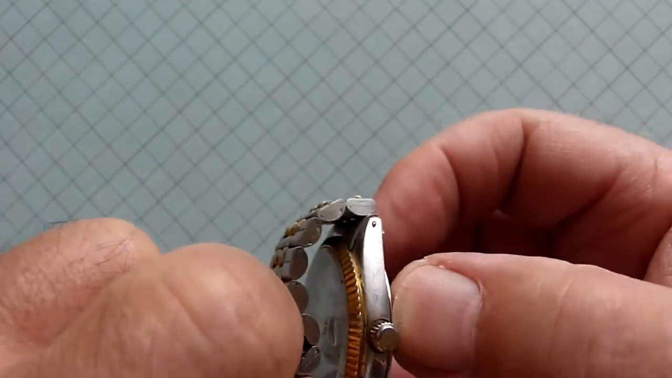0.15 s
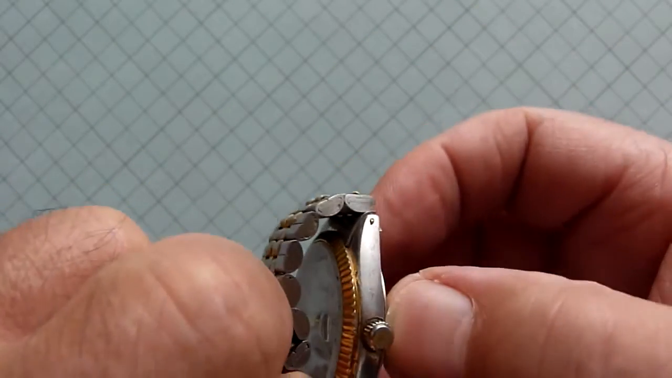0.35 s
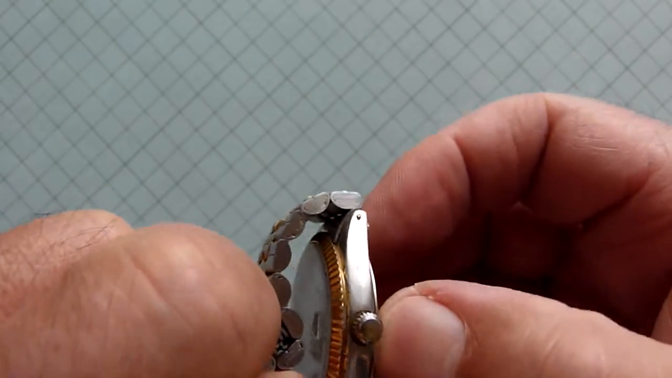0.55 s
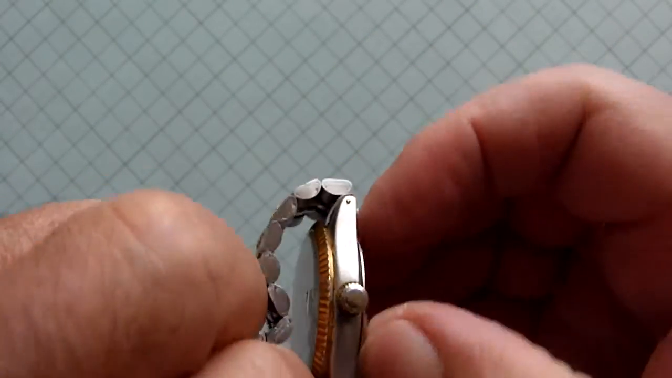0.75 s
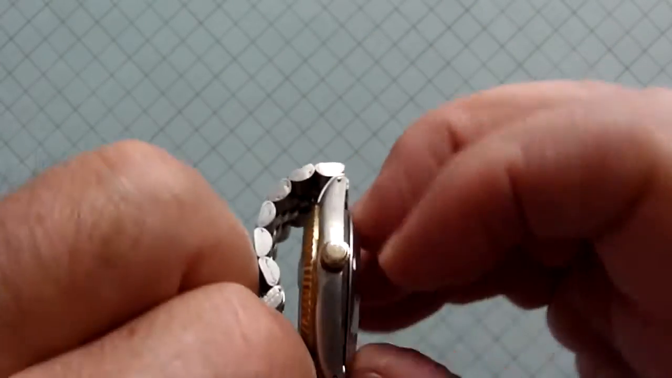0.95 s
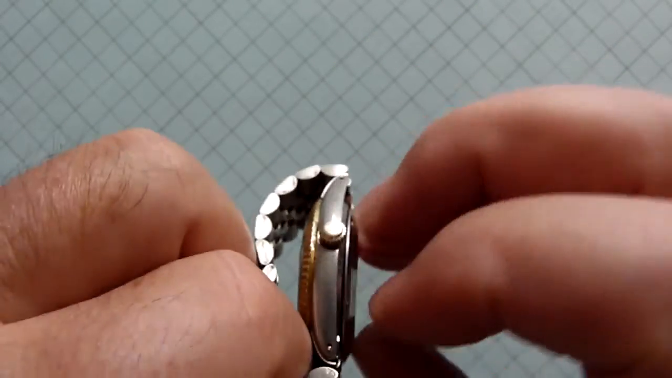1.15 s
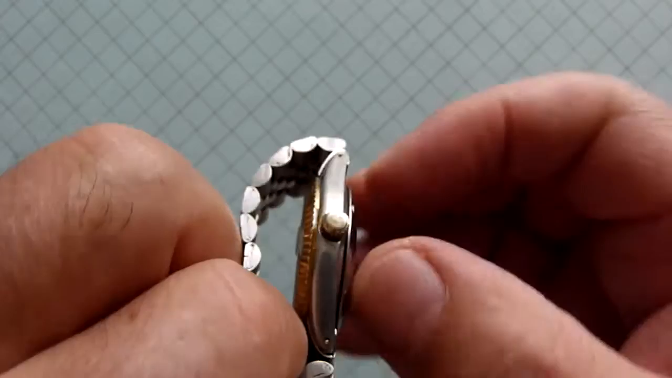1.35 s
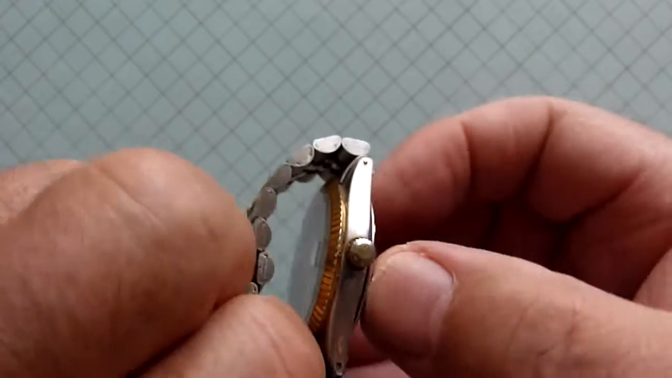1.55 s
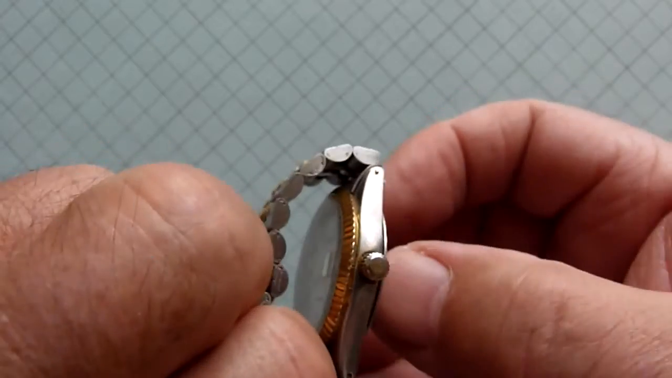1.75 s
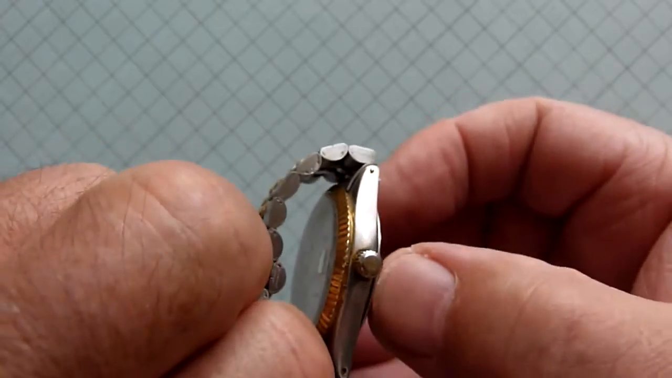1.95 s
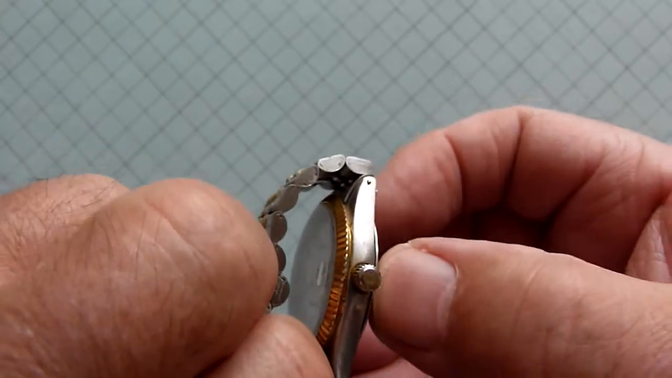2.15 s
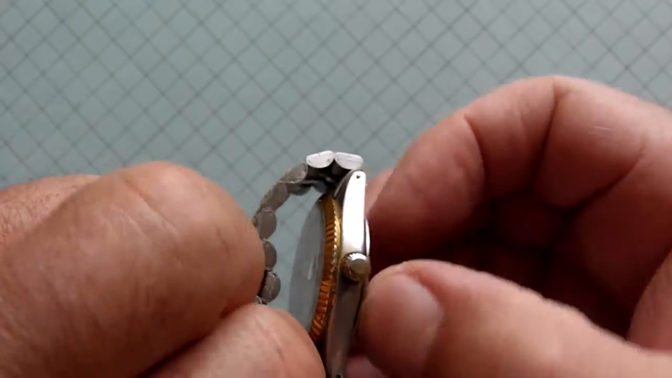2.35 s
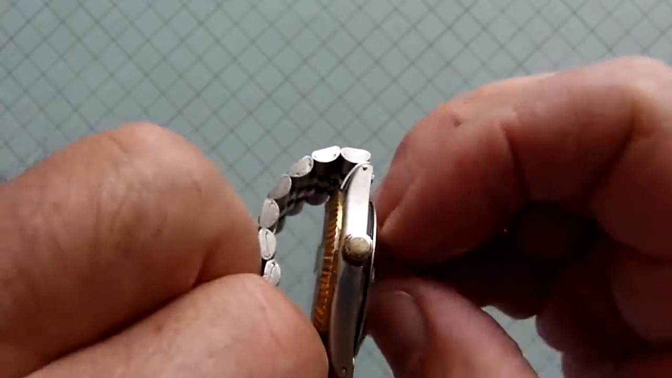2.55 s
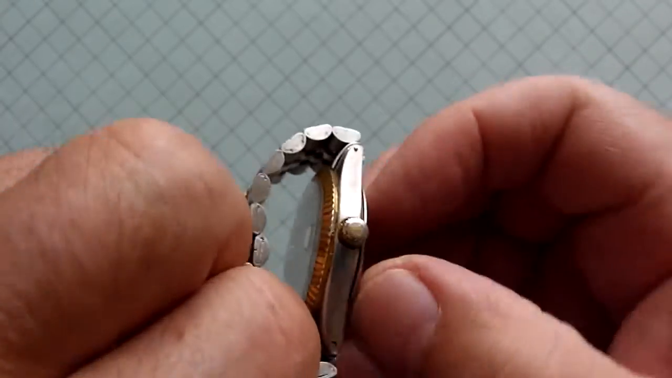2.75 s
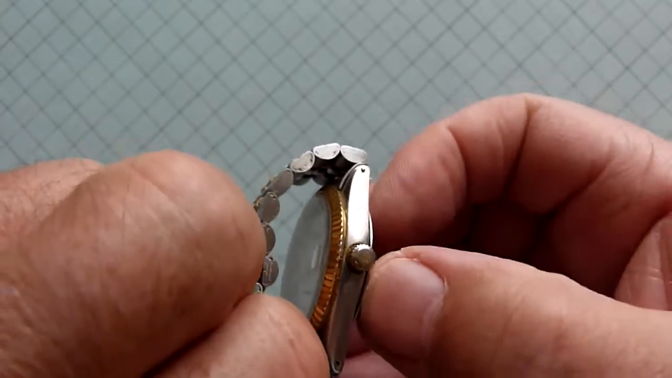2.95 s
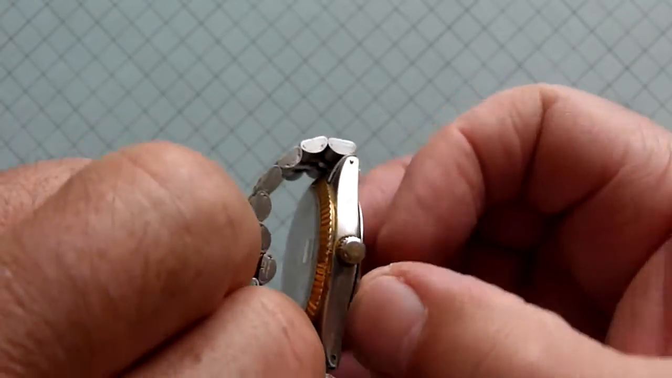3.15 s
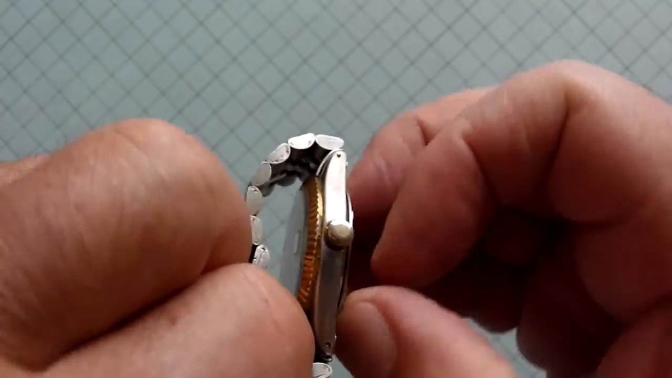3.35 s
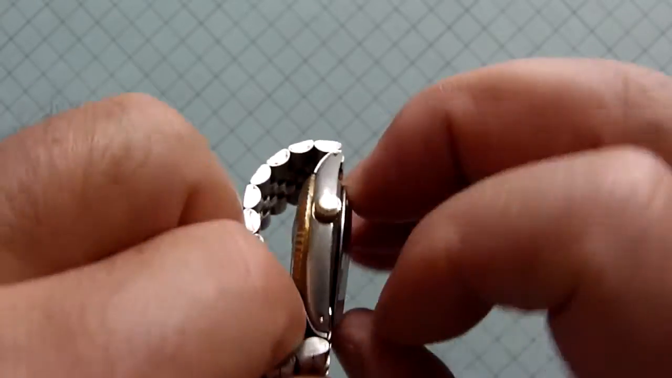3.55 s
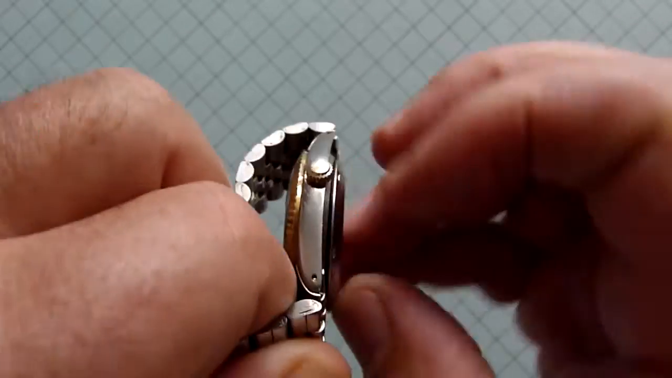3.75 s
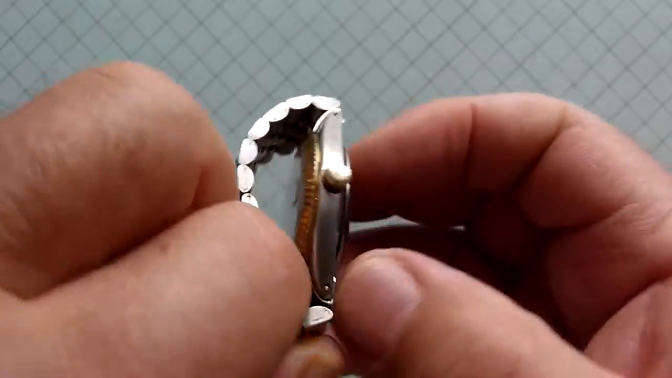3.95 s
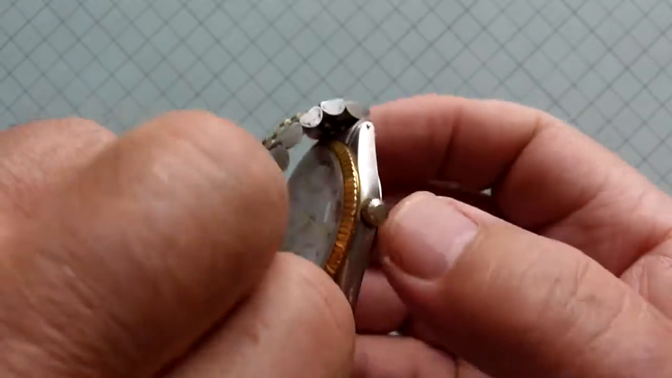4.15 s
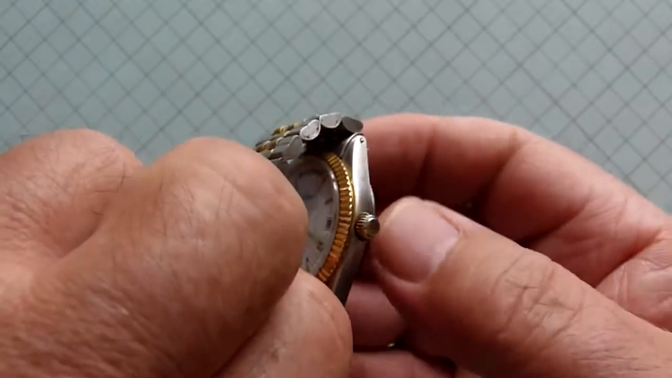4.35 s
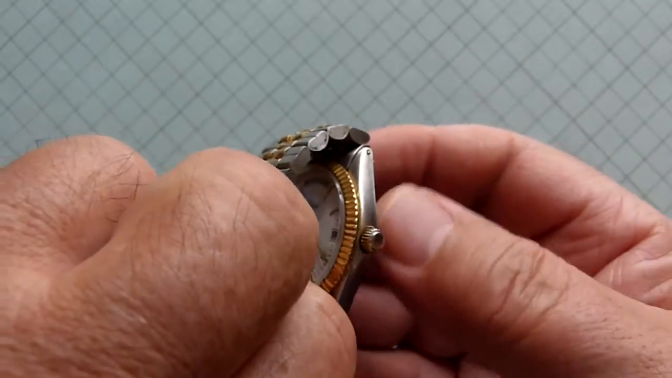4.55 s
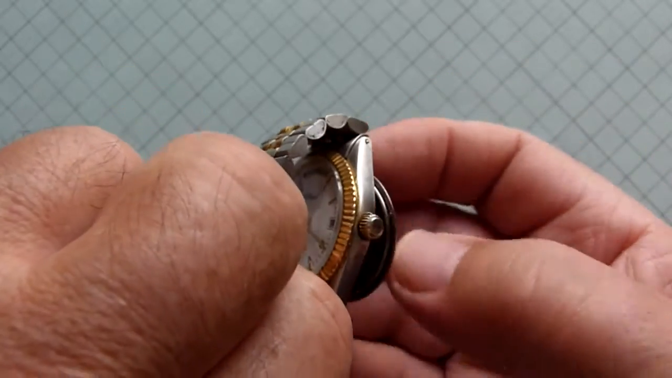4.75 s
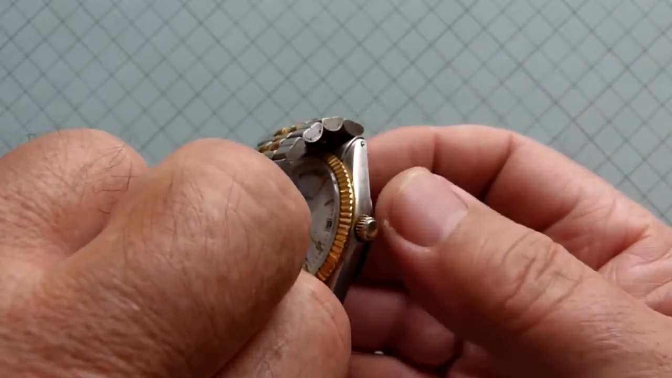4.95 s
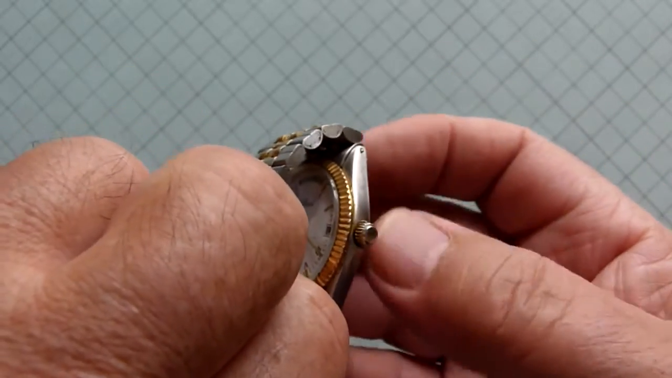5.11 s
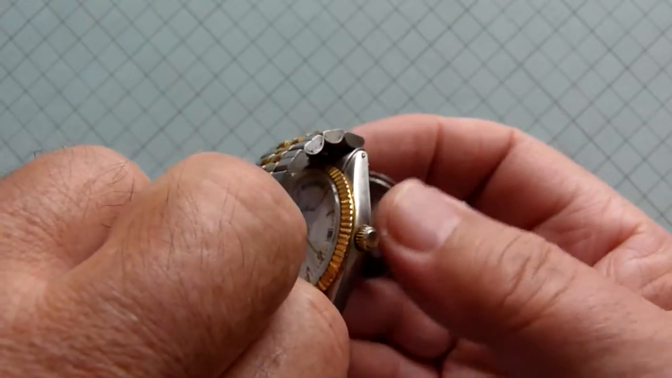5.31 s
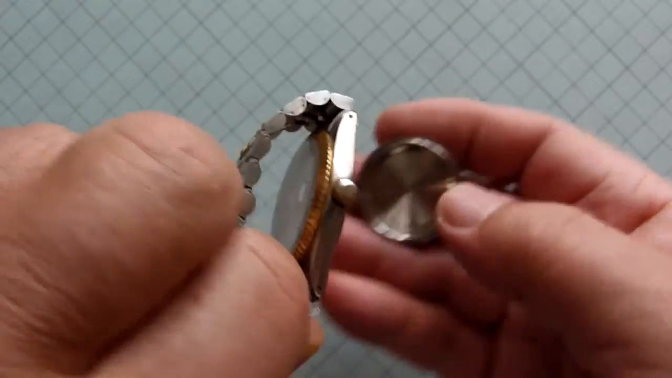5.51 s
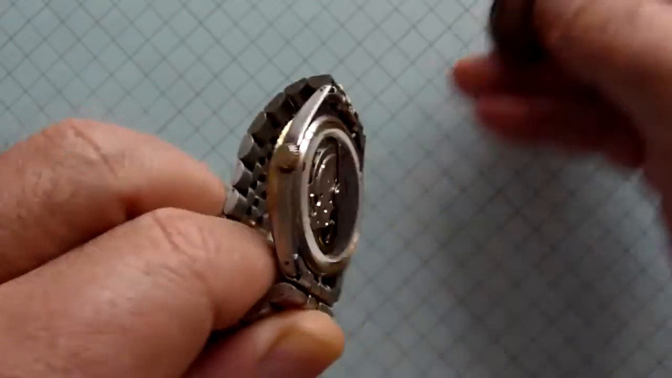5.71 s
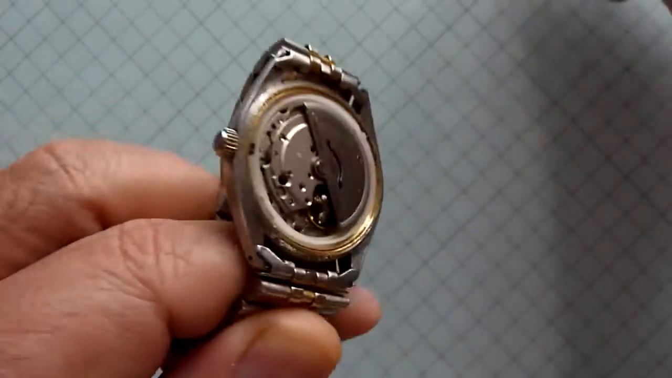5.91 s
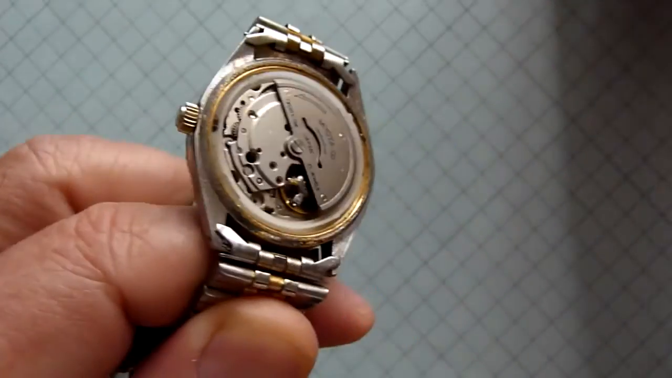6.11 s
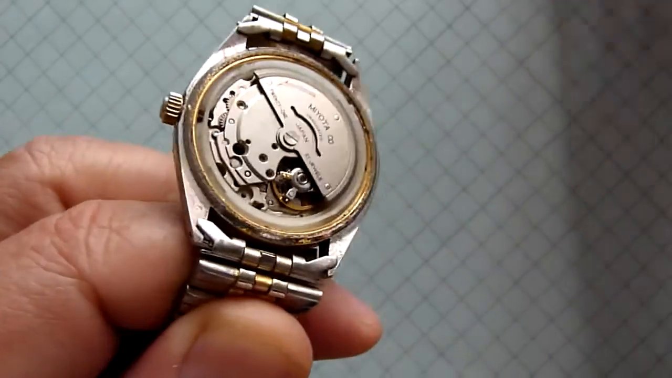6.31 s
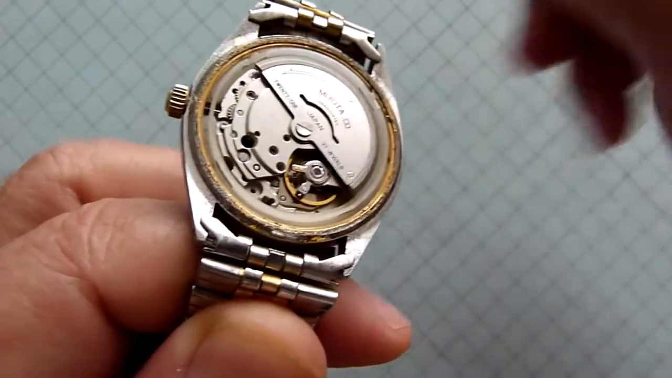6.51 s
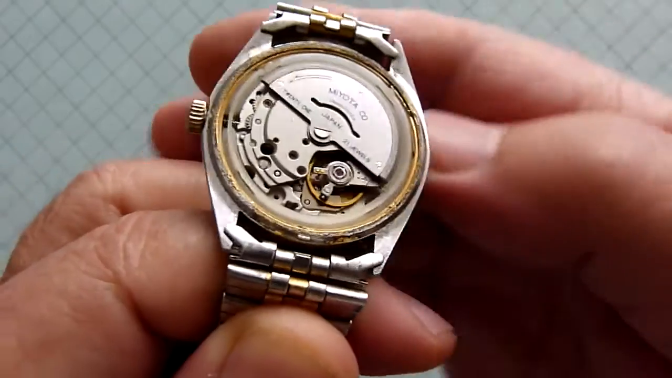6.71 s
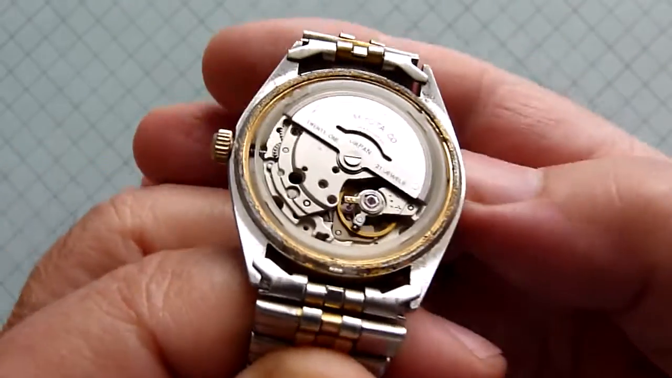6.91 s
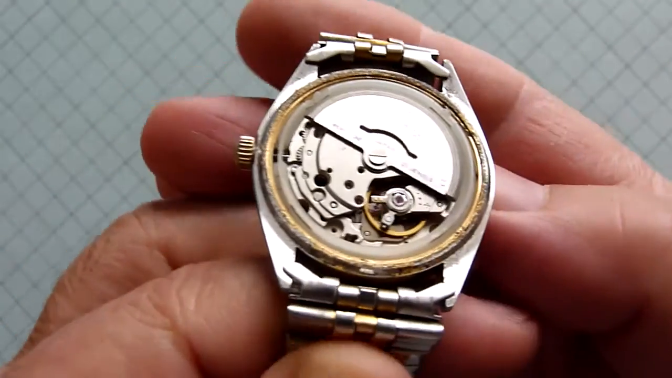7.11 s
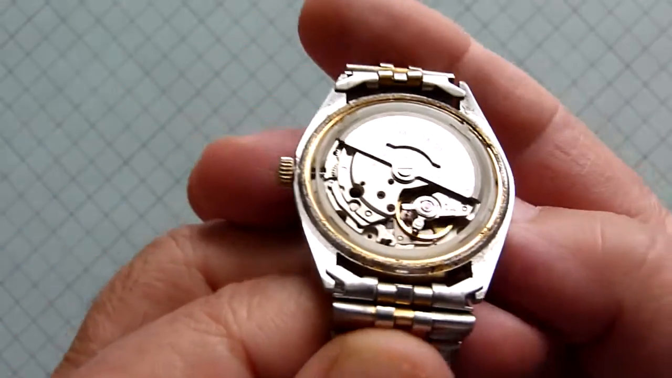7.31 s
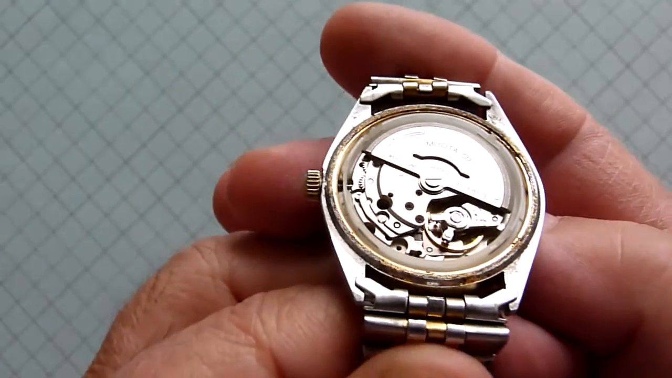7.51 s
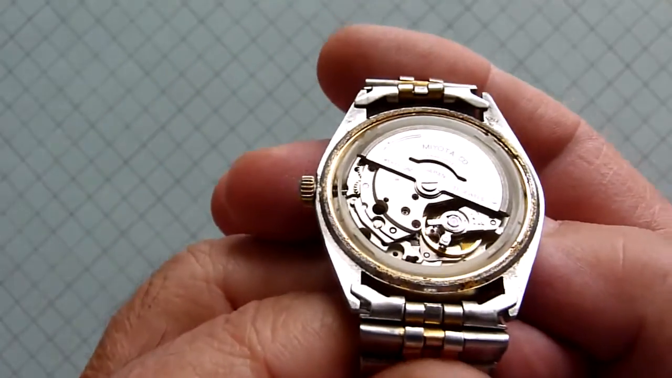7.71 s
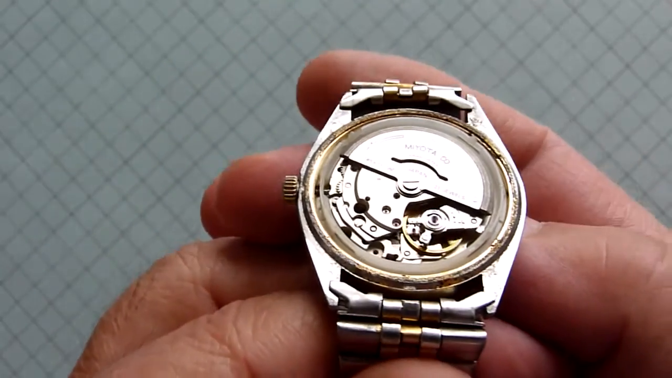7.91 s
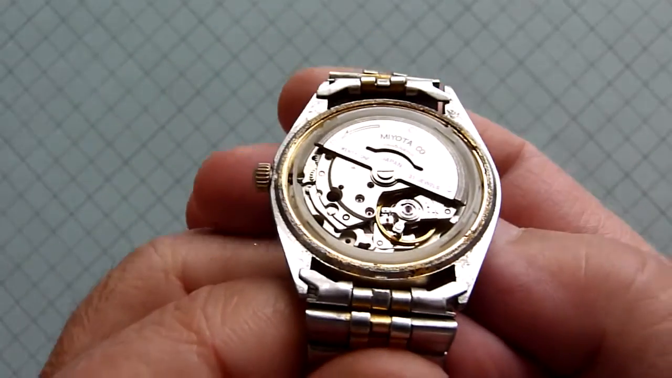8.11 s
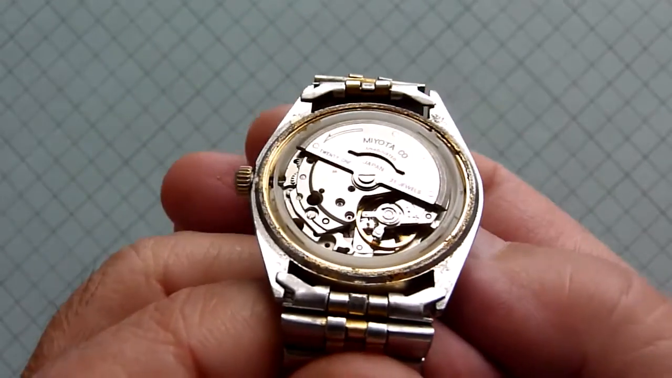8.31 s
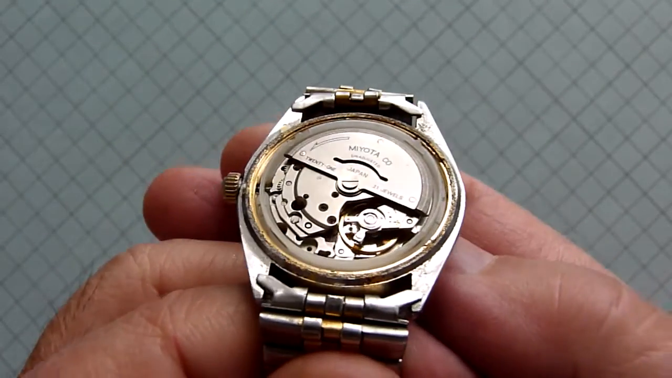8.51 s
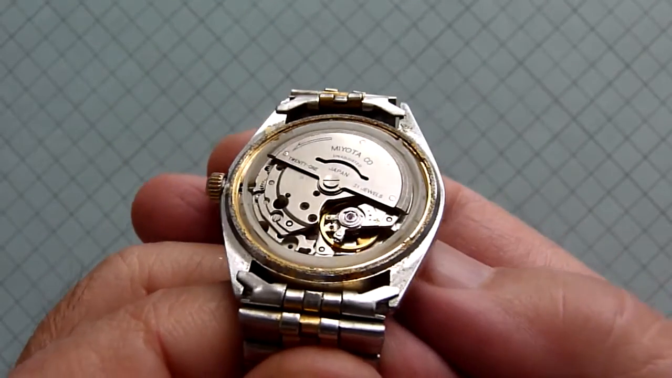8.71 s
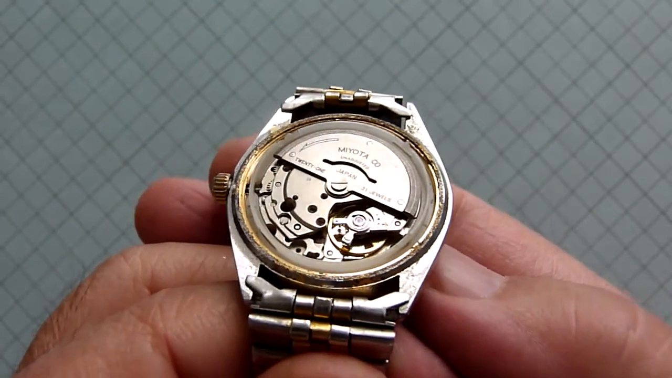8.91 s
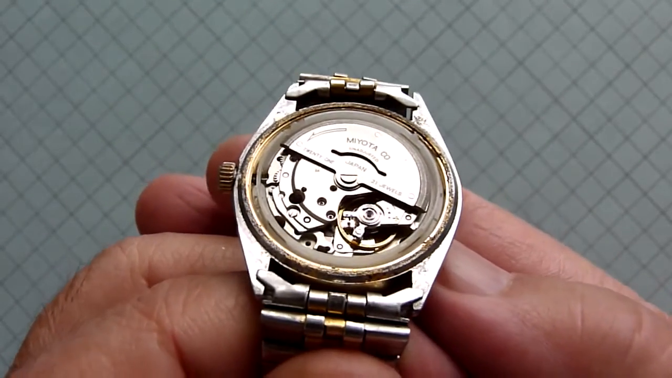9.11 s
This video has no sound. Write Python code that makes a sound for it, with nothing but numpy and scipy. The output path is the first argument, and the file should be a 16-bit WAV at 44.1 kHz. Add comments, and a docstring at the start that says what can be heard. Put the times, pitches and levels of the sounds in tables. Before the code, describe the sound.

Small metal ticks and rattles as a wristwatch's steel back is pried loose, snaps off with a bright clink, then is set down.

```python
"""The steel back of a wristwatch is pried off: the thin lid rattles on the case, squeaks on the rim,
then snaps free with a bright, ringing clink. Before that, bracelet links tick and a fingernail clicks.
The lid lands on a mat in three dull knocks, and the bracelet clinks once more.
Each hit is a set of decaying modes plus a crack of noise; rubs and scrapes are sprays of tiny slips.
It all plays close up in a small, quiet room with a humming motor."""
import sys
import numpy as np
from scipy import signal
from scipy.fft import rfft, irfft, next_fast_len
from scipy.io import wavfile
from scipy.ndimage import map_coordinates

SR = 44100
rng = np.random.default_rng(int(sys.argv[2]) if len(sys.argv) > 2 else 0)


def put_to_file(sound):
    """Save the sound as 16-bit audio at rate SR, in the file named by the first command-line argument."""
    columns = np.atleast_2d(sound).T  # one column per channel
    safe = np.clip(columns, -1, 1)
    whole_steps = np.round(safe * 32767)
    wavfile.write(sys.argv[1], SR, whole_steps.astype(np.int16))


N = 404232
BENDING_HZ = 2600  # modes below this bend the whole part


def lid():
    """The thin steel disc rattles on the case; hard taps crack sharply and leave it ringing."""
    # lid hitting the case: t/s, body/dB, edge/dB, f/Hz favoured by the point of contact
    taps = [(4.108, -49.5, -55.5, 1620), (4.137, -45, -53, 1700), (4.1743, -36.5, -57, 1200),
            (4.1844, -44, -51, 1650), (4.211, -38.5, -32.5, 1400), (4.218, -39.5, -45, 1730),
            (4.321, -43.5, -39.5, 1290), (4.695, -37.5, -44.5, 1650), (4.701, -33, -44.5, 1450),
            (4.7091, -41.5, -45.5, 1400), (4.748, -45, -55, 1550), (4.8597, -37, -43.5, 1730),
            (4.9466, -43.5, -50.5, 1720), (5.1905, -42.5, -61, 1400), (5.2259, -32, -34.5, 1880),
            (5.3515, -40.5, -58, 1600), (5.3573, -38, -45, 1580), (5.539, -28, -21, 1700),
            (5.5447, -40.5, -26.5, 1800), (5.5866, -31.5, -28, 2150), (5.6022, -44, -37.5, 2150),
            (5.606, -36, -37.5, 2100)]
    # the disc's modes: f/Hz, energy/dB, t60/s before the sustain factor
    disc_modes = [(1190, 1, 0.016), (1444, 3, 0.018), (1596, 8.5, 0.019), (1796, 11.5, 0.01),
                  (2010, 3, 0.028), (2232, -2.5, 0.037), (3630, -13, 0.028), (4840, 2, 0.0077),
                  (5660, -4, 0.022), (6830, -11, 0.017), (8700, -5.5, 0.018), (9370, -3.5, 0.016),
                  (10750, -12, 0.01), (11500, 2.5, 0.032), (14600, -7, 0.023)]
    # the disc's lasting shimmer: f/Hz, relative level/dB
    shimmer = [(2184, -20), (5655, -20), (6900, -26), (8526, -23), (8660, -22), (9398, -22), (10745, -21),
               (11377, -21), (11444, -15), (11508, -22), (14510, -22)]
    # the case singing along under the seated lid: f/Hz, energy/dB, t60/s before the sustain factor
    case_ring = [(3650, -2, 0.028), (5670, 2, 0.047)]
    free_s = 5.53  # the lid comes away
    ring_t60, halving_hz = .38, 11000  # the shimmer's decay time halves every halving_hz
    out, t = np.zeros((2, N)), np.arange(SR // 3) / SR
    for s, body_db, edge_db, favoured_hz in taps:
        modes, partials = favour(disc_modes, favoured_hz, slope_db=21.5), shimmer
        if s < free_s:  # damped by the case, screened from the room by the hands
            modes, partials = seated(modes) + case_ring, seated(partials)
            sustain, wet_db, ring_db, max_tilt_db = 0.61, -10, -7, 3.5
        else:
            sustain, wet_db, ring_db, max_tilt_db = 0.7, -8, 0.5, 6.5
        modes = [(hz, db, t60 * sustain) for hz, db, t60 in modes]
        hardness_db = edge_db - body_db
        tilt_db = np.clip(2 * hardness_db + 7, -6.5, max_tilt_db)
        tap = contact(modes, body_db, edge_db, tilt_db,
                      crack_db=0.099 * hardness_db - 1, crack_t60=0.012, crack_hz=6530, scatter_db=-6)
        ring = sum(amp(db) * fade(t, ring_t60 * .5 ** (hz / halving_hz))
                   * np.sin(2 * np.pi * (hz * t + rng.random((2, 1)))) for hz, db in partials)
        clink = amp(edge_db + min(tilt_db, 0) + ring_db) * ring
        add(clink, 0, tap)
        add(out, s, in_room(clink, wet_db))
    # the lid sits to the right, so the left side is shaded from its treble
    return filtered(out, lambda f: amp(np.array([[-1], [1]]) * 0.99 * (f / 12000) ** 2))


def seated(modes):
    """The rim of the case presses on the lid and damps one band of its modes."""
    centre_hz, half_width_hz, loss_db = 9800, 1000, 4
    return [(hz, db - loss_db * np.exp(-((hz - centre_hz) / half_width_hz) ** 2), *rest)
            for hz, db, *rest in modes]


def release():
    """The lid springs out of its seat with one very short, bright snap."""
    # the snap: t/s, peak/dB, f/Hz, width/s, lag between left and right/s
    rim_snap = (5.5394, -4.5, 10200, .00018, .00002)
    s, db, hz, width, lag = rim_snap
    out, t = np.zeros((2, N)), np.arange(-SR // 500, SR // 500) / SR
    stereo_t = t + np.array([[-.5], [.5]]) * lag
    snap = amp(db) * np.exp(-np.abs(stereo_t) / width) * np.cos(2 * np.pi * hz * stereo_t)
    add(out, s + t[0], in_room(snap, wet_db=-11))
    return out


def squeaks():
    """The lid sticks and slips on the rim at its own bending note: tiny chirps that sag in pitch."""
    # stick-slip chirps: t/s, length/s, level/dB, f/Hz
    chirps = [(4.7, 0.0057, -46, 1820), (4.8653, 0.0054, -32.5, 1800), (4.8718, 0.0053, -32.5, 1680)]
    sag, overtones_db = .02, (-14, -23, -26)
    out = np.zeros((2, N))
    for s, length, db, hz in chirps:
        size = int(length * SR)
        phase = 2 * np.pi * np.cumsum(hz * (1 + sag * np.linspace(.5, -.5, size))) / SR
        overtones = sum(amp(over_db) * np.sin(k * phase + 2 * np.pi * rng.random())
                        for k, over_db in enumerate(overtones_db, 2))
        chirp = amp(db) * unit(np.sin(phase) + overtones) * signal.windows.tukey(size, .5)
        add(out, s, in_room(np.array([chirp, chirp]), wet_db=-9))
    return out


def mat():
    """The soft mat dulls the lid's knocks to hollow notes, and the table thumps underneath."""
    # lid set down: t/s, body/dB, edge/dB, favoured f/Hz, table thump/dB
    knocks = [(6.3864, -28, -42, 1260, -43), (6.5902, -34, -45, 910, -36), (6.6305, -31, -46.5, 1180, -47)]
    # the lid's modes on the mat: f/Hz, energy/dB, t60/s
    muted_modes = [(598, -11, 0.022), (1055, 4, 0.011), (1270, 2, 0.0056), (1920, 10.5, 0.0066),
                   (3230, 3.5, 0.0031), (11600, -1, .01)]
    out = np.zeros((2, N))
    for s, body_db, edge_db, favoured_hz, thump_db in knocks:
        modes = favour(muted_modes, favoured_hz, slope_db=22.5)
        knock = contact(modes, body_db, edge_db, tilt_db=-9.5,
                        crack_db=1, crack_t60=0.028, crack_hz=2500, scatter_db=-9)
        add(out, s, in_room(knock, wet_db=-6.5))
        add(out, s, in_room(thump(thump_db, hz=344), wet_db=-5.5))
    return out


def nail():
    """A fingernail slips off the tightly held case: dead clicks, brighter for harder slips."""
    # slips off the rim: t/s, body/dB, edge/dB
    clicks = [(2.7461, -36.5, -45), (2.7712, -44.5, -48), (2.8922, -38.5, -36), (3.6563, -46, -44),
              (3.8561, -48, -47.5), (3.932, -56, -50.5), (4.3988, -44.5, -47)]
    # the gripped case's modes: f/Hz, energy/dB, t60/s
    case_modes = [(440, -15, 0.0094), (1150, 4.5, 0.0028), (1450, 5.5, 0.0033), (1890, -8, 0.0081),
                  (3600, 1, 0.0024), (6130, 4.5, 0.0038), (9100, 11, 0.0036), (11560, -2, 0.018)]
    out = np.zeros((2, N))
    for s, body_db, edge_db in clicks:
        tilt_db = 0.11 * (edge_db - body_db) - 4.5
        click = contact(case_modes, body_db, edge_db, tilt_db,
                        crack_db=-1.5, crack_t60=0.018, crack_hz=4200, scatter_db=-8.5)
        add(out, s, in_room(click, wet_db=-9))
    return out


def bracelet():
    """Small links fall against each other with thin ticks; the freer the link, the brighter."""
    # link hits: t/s, body/dB, edge/dB
    ticks = [(0.7063, -53.5, -61.5), (1.133, -52, -55), (1.317, -47.5, -43), (1.4791, -50, -44),
             (1.568, -51, -46), (1.577, -52, -51), (1.6914, -48.5, -44), (1.748, -52, -61),
             (1.9958, -62, -57), (3.003, -62, -52.5), (6.5907, -78, -50.5), (7.415, -57, -53.5),
             (7.751, -67, -52.5), (7.8464, -72, -45.5), (7.8498, -76, -43), (7.8526, -66, -36.5),
             (7.899, -83, -48)]
    # a link's modes: f/Hz, energy/dB, t60/s
    link_modes = [(1000, 7.5, 0.011), (1655, 9.5, 0.0083), (3560, -10, 0.0077), (6370, -4, 0.0019),
                  (9020, -6, 0.0038), (11500, -7.5, 0.0064), (14000, -10, 0.0046)]
    out = np.zeros((2, N))
    for s, body_db, edge_db in ticks:
        tilt_db = min(0.3 * (edge_db - body_db) - 3, 8)
        tick = contact(link_modes, body_db, edge_db, tilt_db,
                       crack_db=-3.5, crack_t60=0.0079, crack_hz=3620, scatter_db=-4.5)
        add(out, s, in_room(tick, wet_db=-7))
    return out


def rubs():
    """The lid or a link slides, catching in many tiny slips that excite one resonance."""
    # slides: middle t/s, length/s, level/dB, f/Hz
    slides = [(0.397, 0.057, -63, 1950), (1.467, 0.018, -52, 1750), (2.909, 0.023, -47, 1770),
              (3.827, 0.058, -55.5, 3030), (4.148, 0.23, -60, 1780), (4.863, .06, -45, 1750),
              (4.95, .14, -58, 1650), (6.441, .12, -57, 1500), (6.605, .035, -44.5, 640)]
    out = np.zeros((2, N))
    for s, length, db, hz in slides:
        size = int(length * SR)
        resonance = signal.iirpeak(hz, Q=2.4, fs=SR)
        catches = slips(size, rate=740, spread_db=5)
        grains = signal.lfilter(*resonance, signal.lfilter(*resonance, catches))
        stroke = amp(db) * unit(grains) * np.hanning(size)
        add(out, s - length / 2, in_room(np.array([stroke, stroke]), wet_db=-6))
    return out


def grit():
    """Links scrape and fingertips brush the steel: a faint, gritty hiss."""
    # link scrapes and fingertip strokes: middle t/s, length/s, level/dB
    strokes = [(1.153, 0.27, -66), (1.337, 0.065, -53.5), (1.579, 0.046, -53), (4.051, .2, -63),
               (6.1, .13, -63.5), (6.72, 0.66, -69.5)]
    # their colour: f/Hz, gain/dB
    colour = [(600, -7), (5500, 1), (15000, -7)]
    out, t = np.zeros((2, N)), np.arange(SR // 200) / SR
    for s, length, db in strokes:
        size = int(length * SR)
        catches = slips(size, rate=900, spread_db=4.5)
        grain = diffuse(len(t)) * fade(t, 0.0015)
        grains = signal.fftconvolve(catches[None], grain, axes=1)[:, :size]
        stroke = amp(db) * coloured(grains, colour) * np.hanning(size)
        add(out, s - length / 2, in_room(stroke, wet_db=-6))
    return out


def knuckle():
    """The case bumps softly against the hand that holds it."""
    # the bump: t/s, level/dB, f/Hz
    bump = (1.5835, -43, 420)
    s, db, hz = bump
    out = np.zeros((2, N))
    add(out, s, thump(db, hz))
    return out


def contact(modes, body_db, edge_db, tilt_db, crack_db, crack_t60, crack_hz, scatter_db):
    """One hit: low modes make the body; high modes and a crack make the edge, tilted tilt_db/octave."""
    # colour of steel snapping on steel: f/Hz, gain/dB
    crack_colour = [(3000, 12), (7000, 2.5), (11000, -4), (13000, -8), (16000, -18.5)]
    t = np.arange(SR // 16) / SR
    hz, db, t60 = np.transpose(modes)[:, :, None]
    low = hz[:, 0] < BENDING_HZ
    grip = rng.standard_normal((4, len(hz), 1))
    pitch = hz * (1 + .035 * grip[0] * np.minimum(1, 0.01 / t60) ** 2)  # fingers detune damped modes
    phase = grip[2:] * (hz / 9500) ** 2.94  # short waves reach left and right out of step
    rings = amp(db + 2 * grip[1]) / np.sqrt(t60) * fade(t, t60) * np.sin(2 * np.pi * pitch * t + phase)
    burst = diffuse(len(t)) * fade(t, crack_t60)
    crack = filtered(burst, lambda f: f ** 2 / (f ** 2 + crack_hz ** 2) * amp(along(crack_colour, f)))
    # the body has a slower attack than the edge
    body = (1 - np.exp(-(t / 0.00082) ** 2)) * rings[:, low].sum(1)
    edge = (1 - np.exp(-t / 0.000091)) * (struck(rings[:, ~low].sum(1)) + amp(crack_db) * struck(crack))
    edge = filtered(edge, lambda f: amp(tilt_db * np.log2(np.hypot(1, f / 3000))))
    # dense early reflections off the hands and the table
    early = diffuse(SR // 50) * fade(t[:SR // 50], 0.099)
    early = amp(scatter_db) * early / np.linalg.norm(early[0])
    early[:, 0] += 1  # direct sound
    low_cut = signal.butter(2, 260, "high", fs=SR)  # so small a thing radiates no bass
    heard = lambda x: struck(signal.lfilter(*low_cut, signal.fftconvolve(x, early, axes=1)[:, :len(t)]))
    return amp(body_db) * heard(body) + amp(edge_db) * heard(edge)


def favour(modes, pitch_hz, slope_db):
    """The point of contact picks among the bending modes: slope_db less for each octave away."""
    return [(hz, db - slope_db * abs(np.log2(hz / pitch_hz)) * (hz < BENDING_HZ), t60)
            for hz, db, t60 in modes]


def thump(db, hz):
    """A short, dull push with no deep bass."""
    t = np.arange(SR // 16) / SR
    push = fade(t, 0.01) * (1 - np.exp(-t / .0012)) * np.sin(2 * np.pi * hz * t)
    low_cut = signal.butter(2, 230, "high", fs=SR)
    return amp(db) * struck(signal.lfilter(*low_cut, push)) * np.ones((2, 1))


def slips(size, rate, spread_db):
    """Tiny friction catches of uneven strength, about rate a second."""
    return (rng.random(size) < rate / SR) * amp(spread_db * rng.standard_normal(size))


def in_room(x, wet_db):
    """x plus the small room's reverb, which blooms over the first milliseconds."""
    # reverb time: f/Hz, t60/s
    decay = [(300, 1), (800, 0.23), (2000, 0.53), (5500, 0.62), (14000, 0.29)]
    hz, t, spectrum = signal.stft(diffuse(SR // 3), SR, nperseg=256)
    tail = signal.istft(spectrum * fade(t, along(decay, hz)[:, None]), SR, nperseg=256)[1]
    tail *= 1 - np.exp(-(np.arange(tail.shape[1]) / SR / .006) ** 2)
    out = amp(wet_db) * signal.fftconvolve(x, tail / np.linalg.norm(tail[0]), axes=1)
    add(out, 0, x)
    return out


def background():
    """A motor's unsteady hum, the low rush of the room and microphone hiss."""
    # motor partials: f/Hz, level/dB
    motor = [(49, -82.5), (99, -72.5), (148, -67.5), (199, -66.5), (253, -65), (301, -68), (346, -66)]
    # room tone colour: f/Hz, gain/dB
    air_colour = [(22, -25), (87, -18), (142, -10), (251, -2.5), (277, -4.5), (350, -7.5), (410, -10.5),
                  (1440, -18.5), (2400, -32), (3120, -85)]
    # hiss colour: f/Hz, gain/dB
    hiss_colour = [(300, -0.5), (2000, 3.5), (3600, 6), (6000, 3.5), (10000, 2), (14800, 0.5), (15500, -30)]
    t = np.arange(N) / SR
    hum = sum(amp(db + 1.6 * wobble(2.9)) * unit(np.sin(2 * np.pi * hz * t + hz / 330 * wobble(7)))
              for hz, db in motor)
    air = coloured(diffuse(N), air_colour) * amp(.7 * wobble(3))
    hiss = coloured(rng.standard_normal((2, N)), hiss_colour)
    return hum + amp(-55.5) * air + amp(-65.5) * hiss


def diffuse(size):
    """White noise from all sides: near mono in the bass, wide in the treble."""
    # stereo image of a diffuse field: f/Hz, left-right correlation
    likeness = [(60, .96), (300, .99), (640, .88), (1400, .72), (3000, .25), (8000, 0)]
    angle = lambda hz: np.arccos(along(likeness, hz)) / 2
    noise = rng.standard_normal((2, size))
    mid, side = filtered(noise, lambda hz: np.array([np.cos(angle(hz)), np.sin(angle(hz))]))
    return np.array([mid + side, mid - side])


def amp(db):
    """Decibels to gain."""
    return 10 ** (np.asarray(db) / 20)


def unit(x):
    """x at rms 1."""
    return x / np.sqrt(np.mean(x ** 2) + 1e-20)


def struck(x):
    """x with rms 1 over its first 4 ms."""
    return x / np.sqrt(np.mean(x[..., :176] ** 2) + 1e-20)


def fade(t, t60):
    """A decay of 60 dB in t60 seconds."""
    return np.exp(-np.log(1000) * t / t60)


def along(points, hz):
    """A curve through (f/Hz, value) points on a log axis, read at hz."""
    f, values = np.transpose(points)
    return np.interp(np.log(hz + 1), np.log(f + 1), values)


def wobble(rate):
    """A smooth random drift, rate knots a second."""
    knots = rng.standard_normal(int(N * rate / SR) + 4)
    grid = np.arange(0, N * rate / SR + 1, 1 / 16)
    return np.interp(np.arange(N) * rate / SR, grid, map_coordinates(knots, [grid]))


def filtered(x, response):
    """x through a complex frequency response."""
    size = x.shape[-1]
    padded = next_fast_len(size + 4096)
    return irfft(rfft(x, padded) * response(np.fft.rfftfreq(padded, 1 / SR)), padded)[..., :size]


def coloured(x, colour):
    """x through an EQ curve of (f/Hz, gain/dB) points, brought to rms 1."""
    return unit(filtered(x, lambda hz: amp(along(colour, hz))))


def add(track, s, sound):
    """Mix a stereo sound into the track at s seconds."""
    part = track[:, round(s * SR):][:, :sound.shape[1]]
    part += sound[:, :part.shape[1]]


def scene():
    """The watch in the hands, over the room tone."""
    handling = bracelet() + grit() + knuckle() + nail()
    return handling + lid() + squeaks() + release() + mat() + rubs() + background()


def record(dry):
    """The camera notches out three narrow bands and rolls off the top treble."""
    # rejected bands: f/Hz, width/Hz
    bands = [(2600, 624), (4600, 590), (7930, 360)]
    rolloff_hz, top_hz = 15300, 16800
    notches = lambda f: np.prod([(hz ** 2 - f ** 2) / (hz ** 2 - f ** 2 + 1j * f * width / 2)
                                 for hz, width in bands], axis=0) ** 2
    band_limit = lambda f: (f < top_hz) / np.hypot(1, (f / rolloff_hz) ** 24)
    return filtered(dry, lambda f: notches(f) * band_limit(f))


dry = scene()
out = record(dry)
put_to_file(out)
```